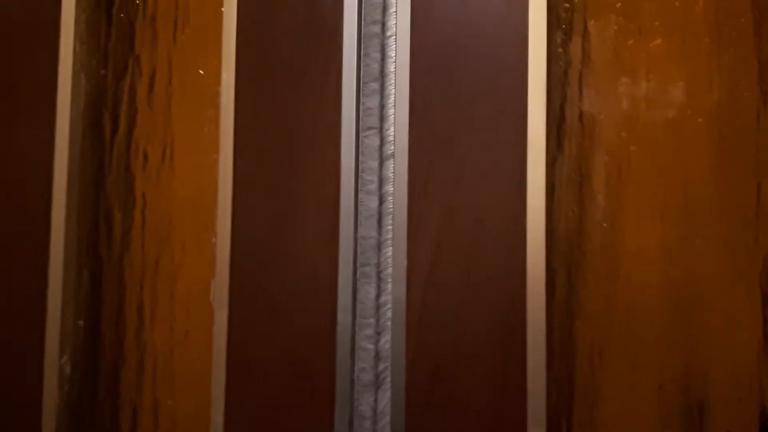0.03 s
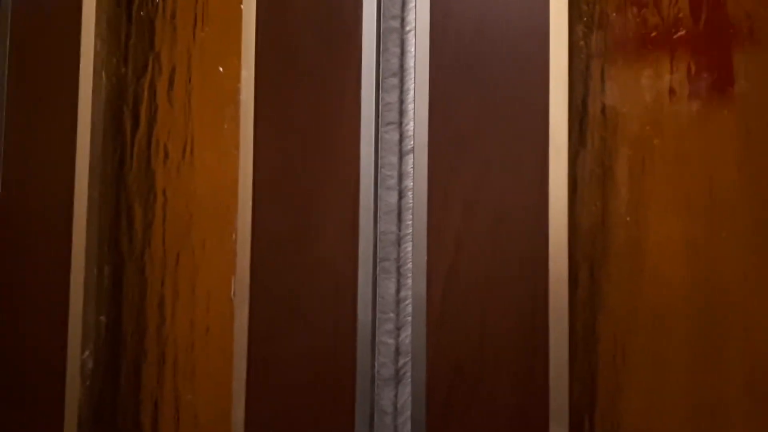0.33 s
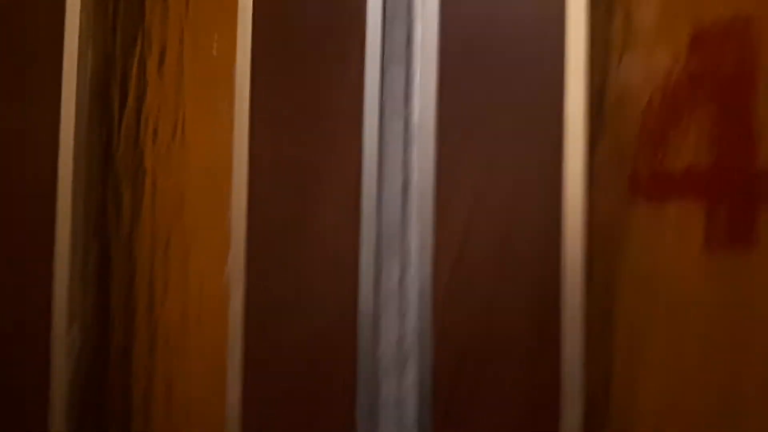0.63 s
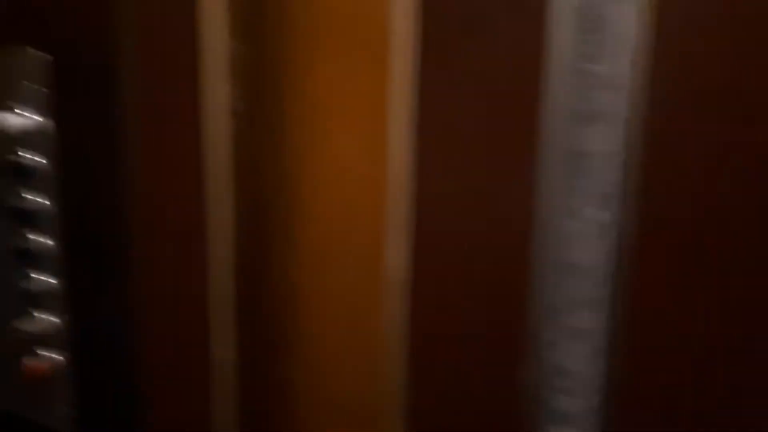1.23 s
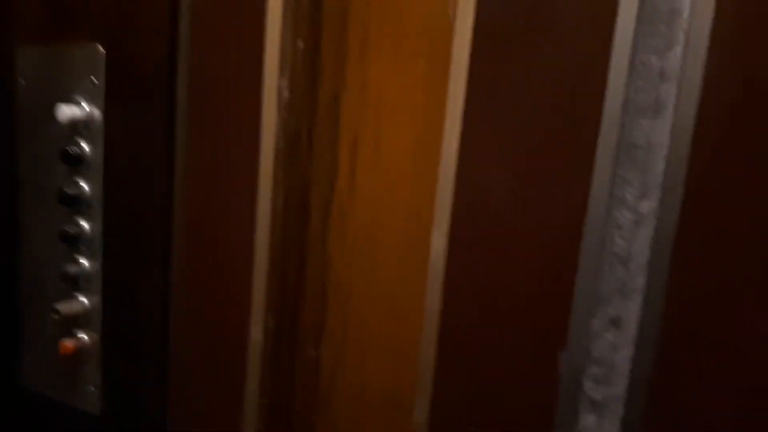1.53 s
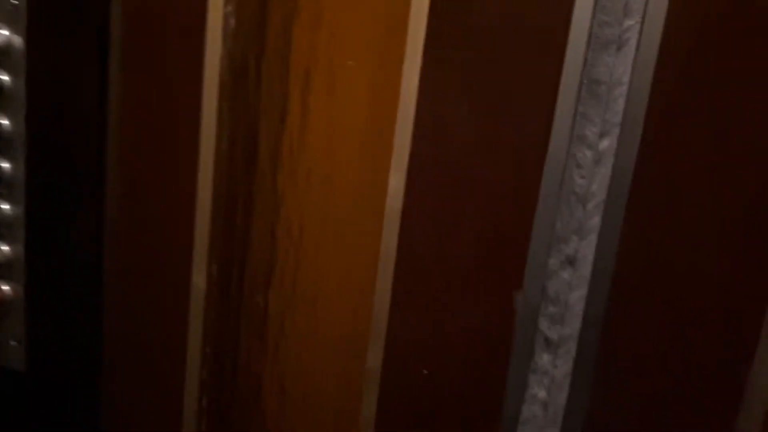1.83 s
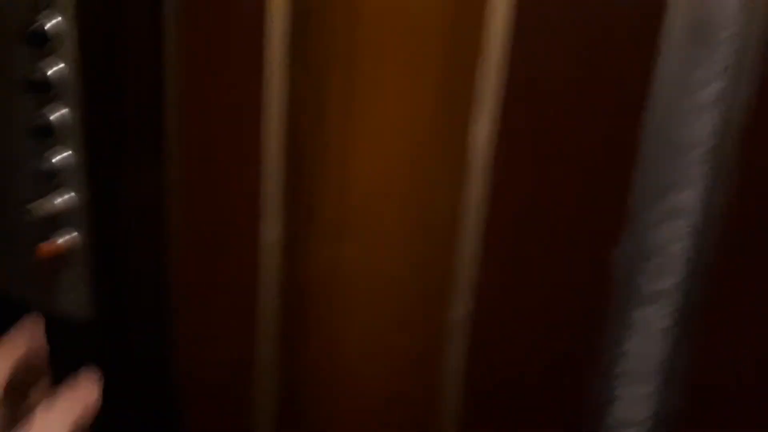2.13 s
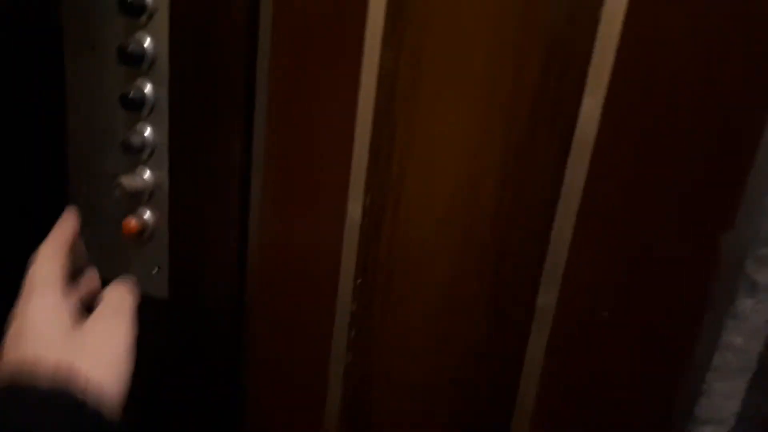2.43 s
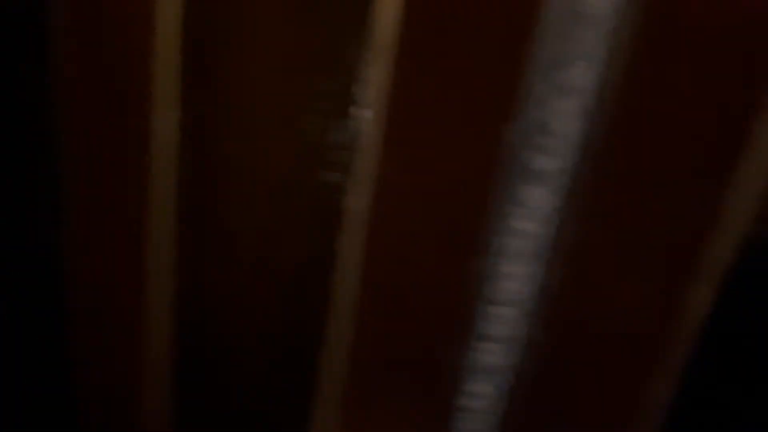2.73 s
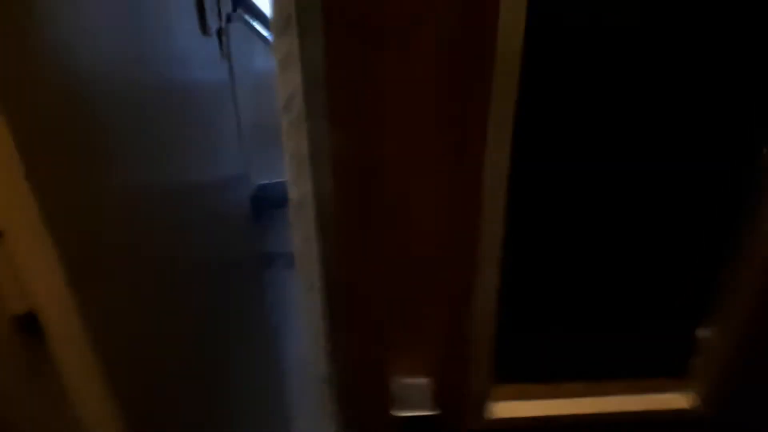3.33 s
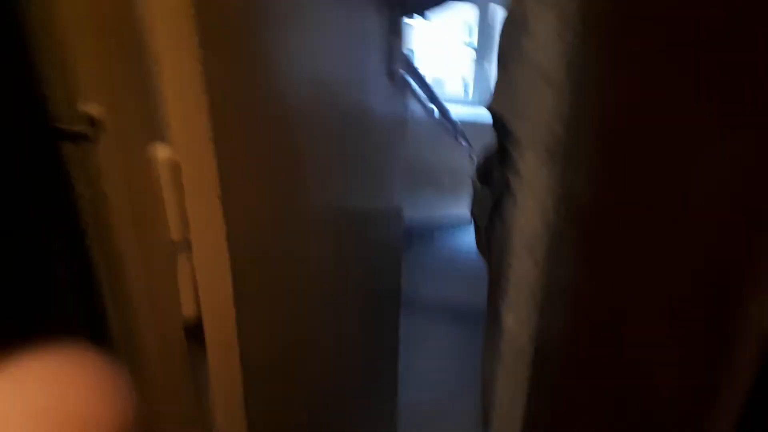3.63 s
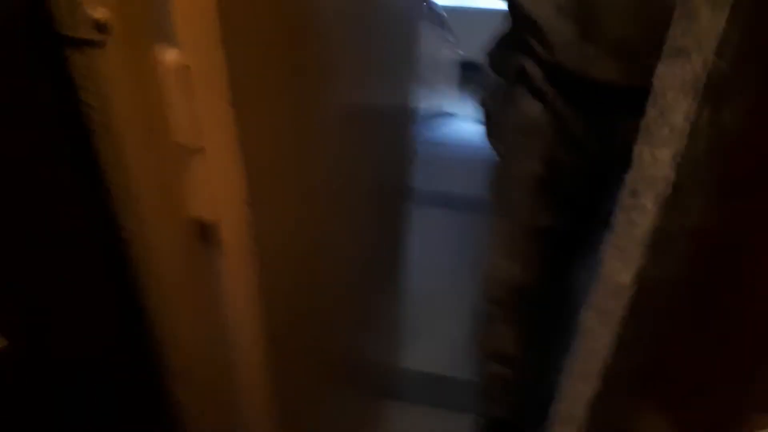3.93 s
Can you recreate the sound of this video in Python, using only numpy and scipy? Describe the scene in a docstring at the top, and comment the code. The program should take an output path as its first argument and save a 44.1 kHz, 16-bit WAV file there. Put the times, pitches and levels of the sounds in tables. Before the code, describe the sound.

An old lift rumbles and judders to a stop, then its wooden doors clunk open.

```python
"""An old lift brakes to a stop, heard from inside its small wooden cabin.
The car rumbles, friction makes the brake sing, and the cabin booms and creaks as the car judders.
The guide shoes rub and squeak on the rails; the switchgear clacks as the rumble dies away.
A sleeve rustles, the latch is worked, and the doors clunk and swing open, ringing in their modes.
Last, a few taps land on the case close to the right microphone. The building hums throughout."""
import sys
import numpy as np
from scipy import signal
from scipy.fft import rfft, irfft
from scipy.io import wavfile
from scipy.ndimage import uniform_filter1d

SR = 44100
rng = np.random.default_rng(int(sys.argv[2]) if len(sys.argv) > 2 else 0)


def master(y):
    """Save y as 16-bit WAV."""
    cut = np.clip(np.atleast_2d(y).T, -1, 1)
    pcm = np.round(cut * 32767)  # scale
    wavfile.write(sys.argv[1], SR, pcm.astype(np.int16))


N = 176400
TIME = np.arange(N) / SR


def amp(db):
    """Amplitude ratio of a level in decibels."""
    return 10 ** (np.asarray(db) / 20)


def unit(x):
    """Normalisation to an rms of 1."""
    return x / np.sqrt(np.mean(x ** 2) + 1e-20)


def read(points, hz):
    """Interpolation on a logarithmic frequency axis."""
    f, value = np.transpose(points)
    return np.interp(np.log(hz + 1), np.log(f + 1), value)


def envelope(curve):
    """Amplitude envelope through points of (time [s], level [dB])."""
    return amp(np.interp(TIME, *np.transpose(curve)))


def add(mix, start, sound):
    """Superposition: a sound joins the mix at its start time in seconds."""
    part = mix[:, max(round(start * SR), 0):][:, :sound.shape[1]]
    part += sound[:, :part.shape[1]]


def colour(x, *tables, size=8192):
    """Minimum-phase filters in cascade: their gains in decibels add."""
    hz = abs(np.fft.fftfreq(size, 1 / SR))
    log_gain = np.log(amp(sum(read(p, hz) for p in tables)))
    response = np.exp(np.conj(signal.hilbert(log_gain)))
    impulse = np.fft.ifft(response).real[:size // 2]
    return signal.fftconvolve(np.atleast_2d(x), impulse[None], axes=1)[:, :x.shape[-1]]


def diffuse(x):
    """Diffuse-field coherence: two microphones hear long waves alike and short waves independently."""
    # left-right likeness (frequency [Hz], correlation [-1 to 1])
    coherence = [(60, 1), (200, 0.92), (400, 0.8), (700, 0.59), (1100, -.15), (2000, -0.029),
                 (8000, -0.0068)]
    n = x.shape[1]
    a, b = rfft(x)
    correlation = np.clip(read(coherence, np.fft.rfftfreq(n, 1 / SR)), -1, 1)
    mid, side = a * np.sqrt((1 + correlation) / 2), b * np.sqrt((1 - correlation) / 2)
    return irfft(np.array([mid + side, mid - side]), n)


def noise(n):
    """White noise in a diffuse field."""
    return diffuse(rng.standard_normal((2, n)))


def rough(n, depth_db, size):
    """Random amplitude modulation by uneven contact, smoothed over size samples."""
    flicker = unit(uniform_filter1d(rng.standard_normal(n), size=size))
    return unit(amp(depth_db * flicker))


def sing(modes, n):
    """Forced resonance: friction noise drives narrow spectral peaks."""
    hz = np.fft.rfftfreq(n, 1 / SR)
    return sum(amp(db) * unit(irfft(rfft(noise(n)) / (1 + (2 * (hz - f) / width) ** 2), n))
               for f, width, db in modes)


def knock(row, tone, early_t60, tail_db, grain_db, sag_db, rise_s, modes=(), ring_db=0):
    """Impact excitation: weakening contacts feed early reflections, reverberation and any free modes.
    Row: (time [s], chatter [s], ping [Hz], ping gain [dB], bass [dB], middle [dB], treble [dB], top [dB])
    """
    # centres of the bass, middle, treble and top bands (frequency [Hz])
    bands = (300, 1000, 4000, 12000)
    # reverberation of the cabin (frequency [Hz], T60 [s])
    cabin_t60 = [(100, 0.45), (400, 0.62), (1000, 0.52), (2800, 0.25), (7000, 0.087), (15000, 0.29)]
    start, chatter, ping_hz, ping_db, *band_db = row
    t = np.arange(24000) / SR
    after = np.maximum(t - chatter, 0)
    contacts = rough(len(t), grain_db, size=40) * amp(sag_db * (.5 - np.minimum(t / chatter, 1)))
    early = noise(len(t)) * contacts * 1e-3 ** (after / early_t60)
    hz, frame_s, spectra = signal.stft(noise(len(t)), SR, nperseg=256)
    decay = 1e-3 ** (np.maximum(frame_s - chatter, 0) / read(cabin_t60, hz)[:, None])
    tail = signal.istft(spectra * decay, SR)[1][:, :len(t)]
    ring = np.zeros_like(early)
    for f, db, t60 in modes:
        cycles = f * rng.normal(1, 0.0028) * t + rng.random((2, 1))
        ring += amp(db - 60 * after / t60) * np.sin(2 * np.pi * cycles)
    onset, build = np.minimum(t / rise_s, 1), np.minimum(t / (chatter + rise_s), 1)
    sound = onset * early + build * (amp(tail_db) * tail + amp(ring_db) * diffuse(ring))
    foot, top = .14, 0.012  # half-widths of the ping's peak, as shares of its frequency
    peak = [(-foot, 0), (-top, ping_db), (top, ping_db), (foot, 0)]
    ping = [(ping_hz * (1 + offset), db) for offset, db in peak]
    overtone = [(f * 1.8, db * 0.14) for f, db in ping]
    return start, colour(sound, list(zip(bands, band_db)), tone, ping, overtone) * np.sqrt(SR / 2)


def car_jolts():
    """Impacts of the stopping car excite the cabin's reverberation."""
    # knocks of the car (columns as in knock)
    jolts = [(.242, 0.016, 6520, 15, -53, -74, -78, -79.5), (.28, 0.024, 2550, 4, -60, -64, -79, -103),
             (.373, 0.012, 7440, 6.5, -52, -60, -75, -80), (.412, 0.018, 976, 13, -55, -68, -89, -87),
             (.465, 0.035, 1200, 10, -54, -71.5, -85, -101),
             (.497, 0.036, 8050, 4, -58.5, -70.5, -81.5, -86), (.556, 0.0038, 8000, 5, -66, -70, -86, -86),
             (.6, 0.021, 7800, 5, -58.5, -65, -86.5, -84), (.69, 0.1, 373, 8, -69, -76.5, -103, -104),
             (.89, 0.0073, 885, 4, -61.5, -72, -113, -104)]
    # their colour (frequency [Hz], gain [dB])
    tone = [(30, -27), (90, -12), (175, -12), (255, -9), (340, -3.5), (500, -1.5), (760, -3.5), (950, -4),
            (1250, -2), (4000, 1.5), (6600, -0.5), (9000, -0.5), (12000, -3.5), (16000, -8)]
    out = np.zeros((2, N))
    for row in jolts:
        add(out, *knock(row, tone, early_t60=0.1, tail_db=-0.5, grain_db=2, sag_db=4, rise_s=0.0017))
    return out


def car_rumble():
    """Structure-borne noise: the car's low rumble swells under braking, then dies away."""
    # course of the rumble (time [s], level [dB])
    levels = [(0, -38.5), (.2, -37), (.5, -31), (.75, -40), (.95, -42), (1.25, -52.5), (1.6, -47.5),
              (1.8, -55.5), (2, -64), (2.4, -60), (4, -80)]
    # its spectrum (frequency [Hz], gain [dB])
    tone = [(20, -28.5), (40, -3.5), (62, -2.5), (92, 7), (120, -9.5), (175, 3), (260, -11), (350, -8),
            (600, -29), (950, -16.5), (1400, -34.5), (2600, -39), (6000, -71), (9000, -82), (16000, -68)]
    return envelope(levels) * unit(colour(noise(N), tone))


def brake():
    """Friction-excited resonance: the shoe sings briefly as it grips."""
    # brake resonances (frequency [Hz], width [Hz], level [dB])
    modes = [(877, 100, -29.5), (965, 40, -33.5), (1675, 37, -39.5), (2570, 240, -35), (3220, 46, -48)]
    start_s, rise_s, t60 = .262, 0.011, 0.57
    out, t = np.zeros((2, N)), np.arange(SR) / SR
    grip = np.minimum(t / rise_s, 1) * amp(-60 * np.maximum(t - rise_s, 0) / t60)
    add(out, start_s, sing(modes, SR) * grip)
    return out


def cabin_booms():
    """Forced vibration: the juddering car makes the cabin boom, in phase at both microphones."""
    # low tone bursts (time [s], duration [s], frequency [Hz], level [dB])
    booms = [(0, 0.15, 84, -39), (0, 0.114, 179.6, -40.5), (0.116, 0.12, 59, -38.5),
             (.13, 0.17, 175.7, -35.5), (.375, 0.074, 168.8, -28.5), (.44, 0.14, 166.4, -34),
             (0.402, 0.18, 96.2, -31.5), (.603, 0.078, 166.8, -24), (0.875, 0.24, 95.4, -45),
             (1.0, 0.086, 58, -44), (1.18, 0.1, 169.2, -46.5), (1.439, 0.1, 87, -42)]
    out = np.zeros((2, N))
    for start, length, hz, db in booms:
        t = np.arange(0, length, 1 / SR)
        swell = np.sqrt(2) * amp(db) * np.sin(np.pi * t / length)
        boom = swell * np.sin(2 * np.pi * (hz * t + rng.random()))
        add(out, start, np.array([boom, boom]))
    return out


def door_clunks():
    """Damped free vibration: the wooden leaves ring in their modes after each impact."""
    # knocks of the leaves (columns as in knock)
    clunks = [(2.94, .05, 410, 8.5, -66, -72.5, -97, -103),
              (3.036, 0.013, 248, 3.5, -40.5, -49, -75.5, -73.5),
              (3.123, 0.011, 421, 10.5, -53, -53.5, -76, -83),
              (3.283, 0.025, 960, 5, -64, -68.5, -84.5, -116)]
    # their colour (frequency [Hz], gain [dB])
    tone = [(30, -32), (100, -13.5), (200, -1), (360, 0), (700, 2), (950, 3.5), (1600, 2), (2800, 7),
            (7000, 3), (16000, -11)]
    # modes of the wood (frequency [Hz], level [dB], T60 [s])
    modes = [(147.4, 7, 0.23), (247, -5, 0.78), (309, 6, 0.23), (342, 9.5, 0.18), (389.6, 4.5, .5),
             (410, -17, 0.3), (503, -3, 1), (760, 8, 0.13), (856, 7, 0.083), (958, 8.5, 0.14)]
    out = np.zeros((2, N))
    for row in clunks:
        add(out, *knock(row, tone, early_t60=0.15, tail_db=-19.5, grain_db=0.5, sag_db=5.5,
                        rise_s=0.00069, modes=modes, ring_db=-28))
    return out


def door_swing():
    """Sliding friction: the moving doors rumble and scrape, a noise dotted with random impulses."""
    # course of the swing (time [s], level [dB])
    levels = [(0, -110), (2.45, -68), (2.56, -53.5), (2.8, -43.5), (2.9, -46), (3.02, -29.5), (3.17, -28.5),
              (3.35, -35.5), (3.5, -39.5), (3.75, -49.5), (4, -46.5)]
    # its spectrum (frequency [Hz], gain [dB])
    tone = [(20, -27), (55, -6), (92, 6.5), (130, -2), (200, -3), (480, -5), (650, -14), (780, -12.5),
            (950, -13), (1500, -17.5), (2600, -20.5), (4400, -22.5), (7000, -29.5), (9000, -32.5),
            (12000, -33.5), (16000, -36.5)]
    grains_per_s = 310
    grains = (rng.random((2, N)) < grains_per_s / SR) * rng.standard_normal((2, N))
    scrape = noise(N) + amp(-9.5) * unit(diffuse(grains))
    return envelope(levels) * unit(colour(scrape, tone))


def latch():
    """Modal ringing: the metal latch and door fittings strike and vibrate freely."""
    # knocks of the metal (columns as in knock)
    strikes = [(2.651, 0.025, 410, 15.5, -71.5, -78.5, -77, -93),
               (2.686, 0.025, 1550, 5.5, -56.5, -59.5, -65, -89.5),
               (2.867, 0.038, 1287, 21, -97, -80.5, -85, -104),
               (3.002, 0.023, 4800, 12, -46.5, -61, -60.5, -112),
               (3.207, 0.029, 7050, -4, -70, -73, -71.5, -80),
               (3.222, 0.028, 1800, -8, -57, -55, -62.5, -82.5),
               (3.319, 0.0098, 900, -4, -64, -56, -73, -87.5)]
    # their colour (frequency [Hz], gain [dB])
    tone = [(30, -29), (100, -24.5), (200, 2.5), (400, -2), (750, 0.5), (1300, 0), (1800, 2), (3000, 2),
            (4700, -1.5), (5800, -2), (7500, 4.5), (16000, -5.5)]
    # modes of the metal (frequency [Hz], level [dB], T60 [s])
    modes = [(241.4, 3.5, 0.45), (385.5, 7.5, 0.23), (660, 6.5, 0.17), (1050, 3.5, 0.13), (1557, 4.5, 0.12),
             (1800, 8, 0.074), (2197, 4, 0.23), (2890, -6, 0.13)]
    out = np.zeros((2, N))
    for row in strikes:
        add(out, *knock(row, tone, early_t60=0.11, tail_db=-14, grain_db=1.5, sag_db=6,
                        rise_s=0.0013, modes=modes, ring_db=-24.5))
    return out


def switchgear():
    """Contact chatter: switchgear and lock lever send bright clacks into the reverberant cabin."""
    # knocks of the mechanism (columns as in knock)
    clacks = [(1.238, 0.0075, 4950, 7.5, -70, -72, -69, -88.5),
              (1.367, 0.015, 6400, -4, -82, -78, -81, -97),
              (1.387, 0.021, 6100, 10.5, -64, -67.5, -78, -91),
              (1.448, 0.015, 4150, 6.5, -68.5, -77, -74.5, -83.5),
              (1.518, .004, 3300, 4, -91, -85, -82.5, -108),
              (1.629, 0.015, 3800, 5.5, -79.5, -69.5, -76.5, -90.5),
              (1.68, .02, 403, 7, -70.5, -92, -112, -103), (1.746, 0.016, 1800, 10.5, -91, -82, -79, -102),
              (2.027, 0.031, 2120, 9, -107, -81.5, -91.5, -102)]
    # their colour (frequency [Hz], gain [dB])
    tone = [(30, -28), (170, -10), (260, -1.5), (470, -2.5), (700, -7), (1000, -5.5), (1600, -8), (2500, 1),
            (3400, -2), (5800, 1), (9000, 3.5), (12000, -0.5), (16000, -5)]
    out = np.zeros((2, N))
    for row in clacks:
        add(out, *knock(row, tone, early_t60=0.15, tail_db=-3, grain_db=1, sag_db=2.5, rise_s=0.0028))
    return out


def case_taps():
    """Impulse response of a case tapped beside the right microphone; the left gets only a dull push."""
    # taps (time [s], push level [dB], snap level [dB], snap pitch [Hz])
    taps = [(3.3874, 1, -20.5, 4080), (3.433, -1, -21.5, 2240), (3.8092, 0, -11, 3100),
            (3.858, -15.5, -57, 905), (3.876, -19, -50, 1500), (3.91, -21.5, -31.5, 1200),
            (3.94, -18, -27, 4960), (3.953, -18, -28, 3800), (3.958, -12.5, -24, 1720),
            (3.9781, -12, -34, 7100)]
    # modes of the case (frequency [Hz], level [dB], T60 [s])
    modes = [(970, -30, 0.017), (1550, -9, 0.049), (3100, -17, 0.017)]
    # spectrum of the push (frequency [Hz], gain [dB])
    push_tone = [(30, 0), (200, 20.5), (600, 17.5), (1500, 14), (3000, 1.5), (4500, -7), (7000, -19),
                 (8700, -42), (11000, -24), (16000, -16)]
    # spectrum of the snap (frequency [multiples of its pitch], gain [dB])
    snap_tone = [(.05, 5), (.3, 4.5), (.5, 0.5), (.75, 8), (1, -6), (1.1, -5), (1.25, -6), (2, -18),
                 (5, -36)]
    # bright edge of the snap (frequency [Hz], gain [dB])
    fizz_tone = [(2000, -20), (7000, -3), (8700, -23), (11000, 3), (16000, 1)]
    rise_s, crack_s, snap_t60, tail_t60 = 0.00047, 0.00079, 0.01, 0.1
    out, t = np.zeros((2, N)), np.arange(SR // 8) / SR
    push = colour(1. * (t == 0), push_tone)[0]
    ring = sum(amp(db - 60 * t / t60) * np.sin(2 * np.pi * f * t) for f, db, t60 in modes)
    fade = amp(-60 * t / snap_t60) + amp(-10.5 - 60 * t / tail_t60)
    for start, push_db, snap_db, hz in taps:
        snap = colour(fade * rng.standard_normal(len(t)), [(k * hz, db) for k, db in snap_tone])[0]
        snap += amp(-17.5) * colour(fade * rng.standard_normal(len(t)), fizz_tone)[0]
        # a few clean cycles at the snap pitch, loudest after crack_s
        crack = amp(-2.5) * (t / crack_s) * np.exp(1 - t / crack_s) * np.sin(2 * np.pi * hz * t)
        near = amp(snap_db) * np.minimum(t / rise_s, 1) * (snap + ring + crack) - amp(push_db) * push
        far = colour(near, [(300, -28), (1000, -31), (3000, -42)])[0]
        add(out, start, np.array([far, near]))
    return out


def guide_shoes():
    """Sliding friction on the rails gives broadband rubbing and drives thin, resonant squeaks."""
    # course of the rubbing (time [s], level [dB])
    rub_levels = [(0, -60), (.13, -76), (.21, -58.5), (.45, -42), (.8, -52.5), (1.05, -59), (1.2, -57),
                  (1.6, -56.5), (1.86, -61), (1.97, -73), (2.4, -100)]
    # its spectrum (frequency [Hz], gain [dB])
    rub_tone = [(200, -1), (1000, -1), (1600, -6), (2500, 0.5), (3300, -1.5), (5800, -2.5), (7600, -6.5),
                (9000, -9), (11500, -17), (16000, -20)]
    # squeaks (time [s], duration [s], top level [dB], low note level [dB])
    squeaks = [(0.388, 0.1, -55, -53), (0.484, 0.16, -46.5, -54), (0.768, 0.063, -62, -62),
               (0.886, 0.071, -63.5, -77), (0.933, 0.12, -70, -56.5), (1.078, 0.036, -87, -60),
               (1.116, 0.078, -62, -78), (1.186, 0.13, -56, -67), (1.289, 0.062, -60, -65),
               (1.38, 0.034, -53, -69), (1.631, 0.17, -61, -76), (1.829, 0.094, -68, -65.5)]
    # resonances of the thin top and the low note (frequency [Hz], width [Hz], level [dB])
    top_modes = [(10980, 650, 1.5), (11960, 1000, -0.5)]
    low_modes = [(2474, 190, 3.5)]
    out = envelope(rub_levels) * unit(colour(noise(N), rub_tone))
    t = np.arange(SR // 4) / SR
    for start, length, top_db, low_db in squeaks:
        grip = np.sin(np.pi * np.minimum(t / length, 1) ** 0.47) * rough(len(t), depth_db=4, size=200)
        squeak = amp(top_db) * sing(top_modes, len(t)) + amp(low_db) * sing(low_modes, len(t))
        add(out, start, grip * squeak)
    return out


def cabin_creaks():
    """Heavily damped transients: each dry creak is a burst of noise with exponential decay."""
    # creaks (time [s], level [dB])
    creaks = [(.735, -37), (.8935, -33), (.918, -32.5), (1.014, -38)]
    # their colour (frequency [Hz], gain [dB])
    tone = [(60, -16), (400, 14), (1000, -8), (2500, -1), (7000, -7), (16000, -15)]
    t60 = 0.011
    out, t = np.zeros((2, N)), np.arange(SR // 4) / SR
    for start, db in creaks:
        add(out, start, colour(noise(len(t)) * amp(db - 60 * t / t60), tone))
    return out


def sleeve():
    """Friction noise of cloth; a changing level difference moves the rustle from left to right."""
    # course of the rustle (time [s], level [dB])
    levels = [(0, -100), (1.9, -80), (2.05, -68.5), (2.17, -62), (2.3, -62), (2.41, -80.5), (2.53, -58),
              (2.585, -48.5), (2.78, -60), (2.97, -61), (3.45, -98), (3.7, -54), (4, -63.5)]
    # its spectrum (frequency [Hz], gain [dB])
    tone = [(100, -15), (800, -1.5), (2500, 2.5), (4400, 2.5), (5300, 1), (6800, 2), (7900, -1), (9000, -4),
            (12000, -11), (16000, -21)]
    # boost on the right and equal cut on the left (time [s], gain [dB])
    pan = [(3.3, -6), (3.6, -2.5), (4, 6.5)]
    rustle = envelope(levels) * rough(N, depth_db=0.93, size=900) * unit(colour(noise(N), tone))
    return rustle * envelope(pan) ** np.array([[-1], [1]])


def building_hum():
    """Stationary background noise: the building's low, diffuse hum."""
    # spectrum of the hum (frequency [Hz], gain [dB])
    tone = [(15, -104), (25, 0), (86, -2.5), (181, -4), (257, -9.5), (438, -6), (978, -33), (5420, -30),
            (6540, -23), (9020, -25), (15000, -37)]
    return amp(-61.5) * unit(colour(noise(N), tone))


def scene():
    """Linear superposition of everything heard in the cabin."""
    impacts = car_jolts() + switchgear() + latch() + door_clunks()
    stopping = brake() + cabin_booms() + guide_shoes() + cabin_creaks() + car_rumble()
    return impacts + stopping + building_hum() + door_swing() + sleeve() + case_taps()


def record(dry):
    """Frequency response: each microphone port colours its channel, then a low-pass limits the band."""
    # responses of the two ports (frequency [Hz], gain [dB])
    left_port = [(60, -0.5), (160, -3.5), (350, .5), (1000, -2), (3000, -6), (7200, -2), (8500, -20),
                 (10000, -8.5), (11500, -5), (16000, -0.5)]
    right_port = [(60, -2), (160, 0.5), (350, -1), (1000, -2), (3000, -1.5), (7600, 0.5), (9000, -7.5),
                  (10000, -3.5), (11500, 1.5), (16000, -5.5)]
    cutoff_hz = 16100
    heard = np.vstack([colour(dry[0], left_port), colour(dry[1], right_port)])
    low_pass = signal.firwin(511, cutoff_hz, window=("kaiser", 9), fs=SR)
    return signal.oaconvolve(heard, low_pass[None], "same")


dry = scene()
out = record(dry)
master(out)
```